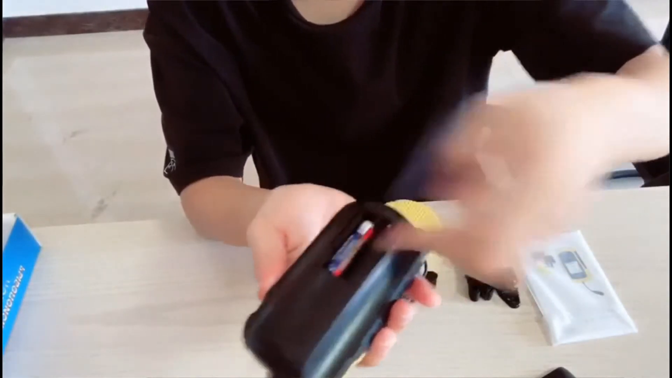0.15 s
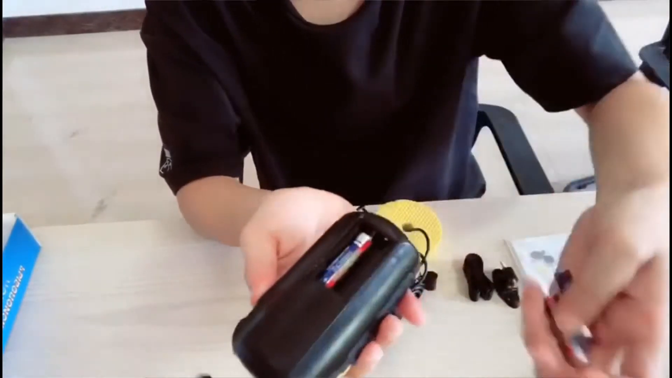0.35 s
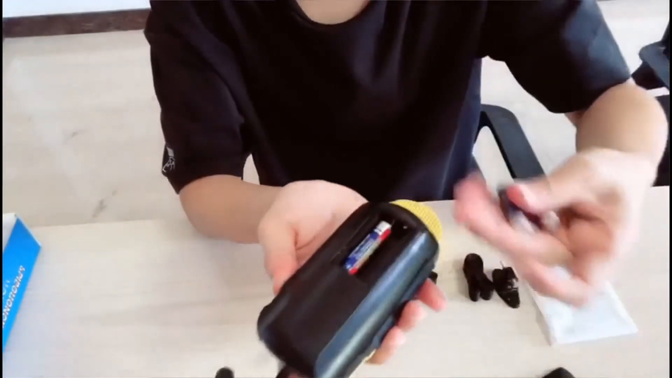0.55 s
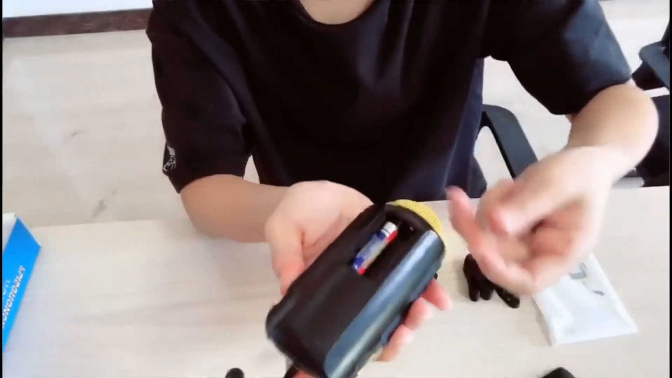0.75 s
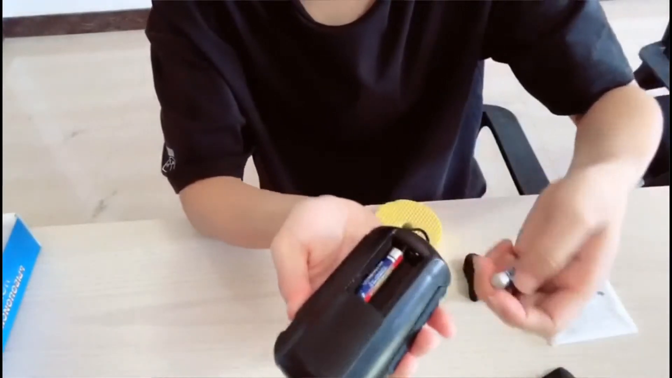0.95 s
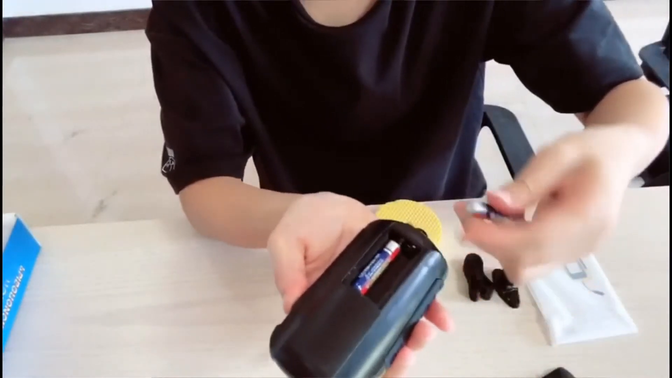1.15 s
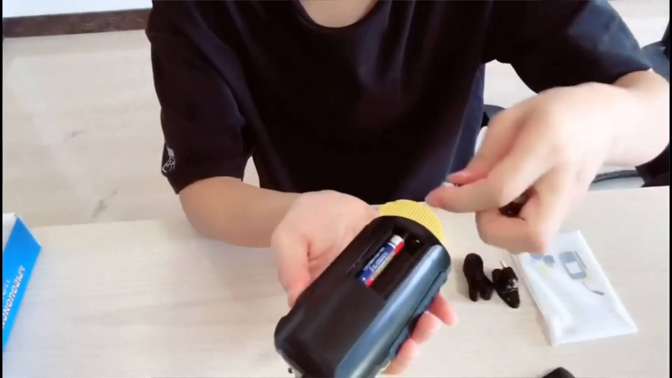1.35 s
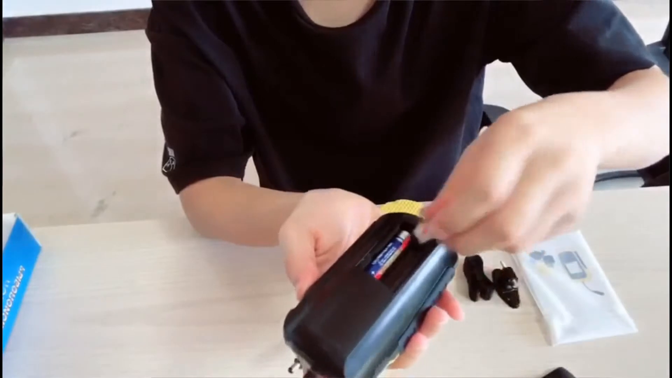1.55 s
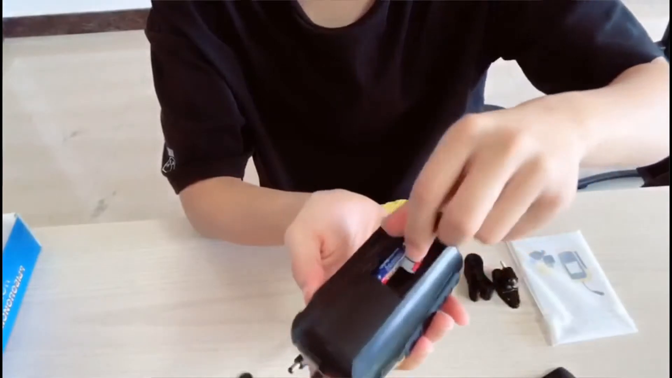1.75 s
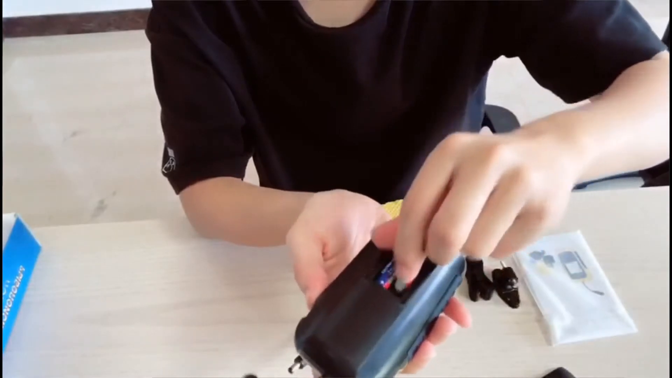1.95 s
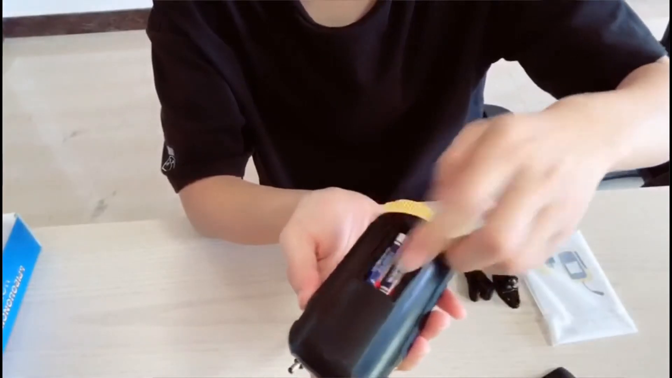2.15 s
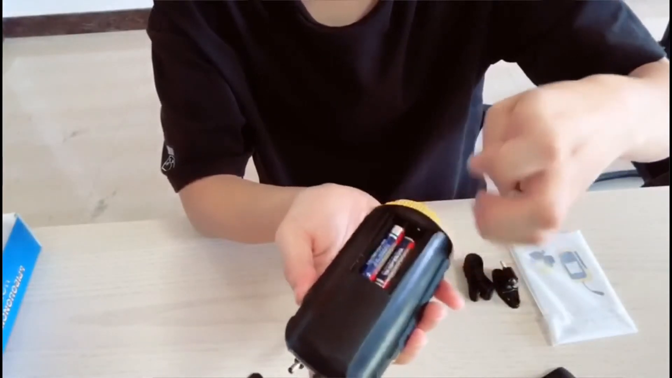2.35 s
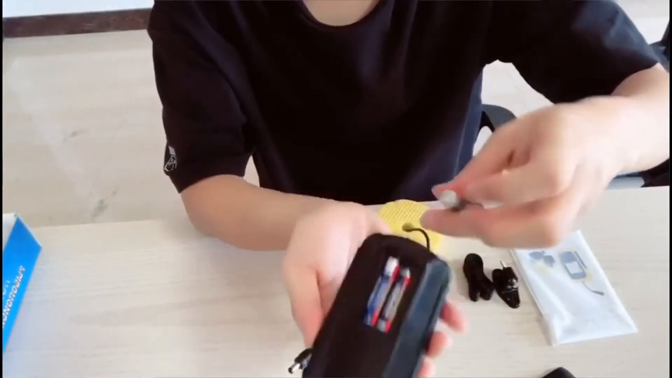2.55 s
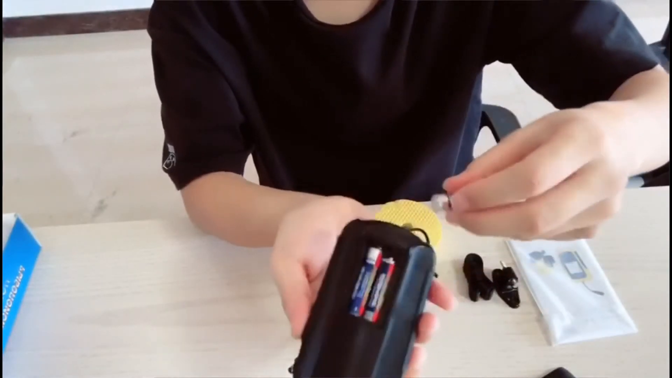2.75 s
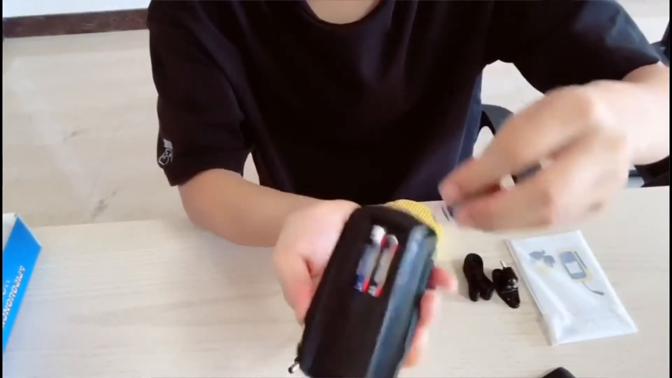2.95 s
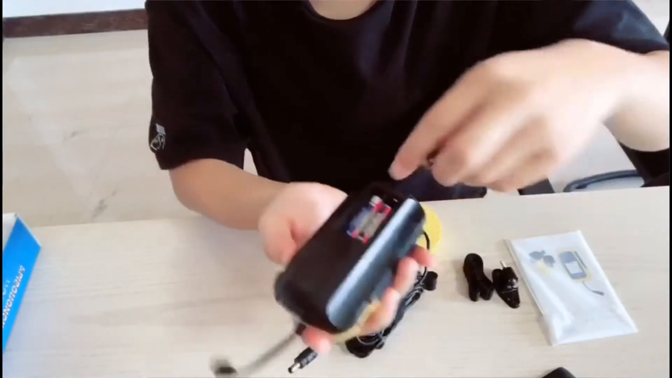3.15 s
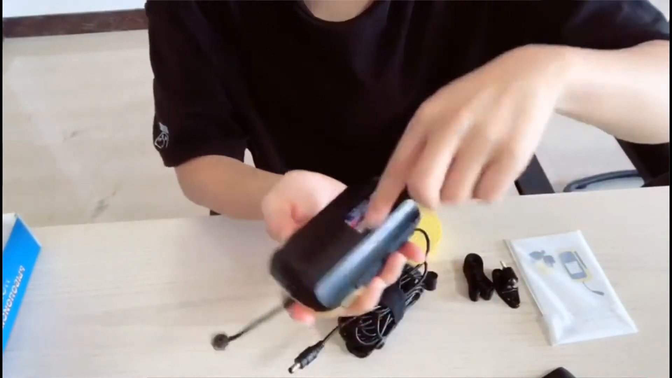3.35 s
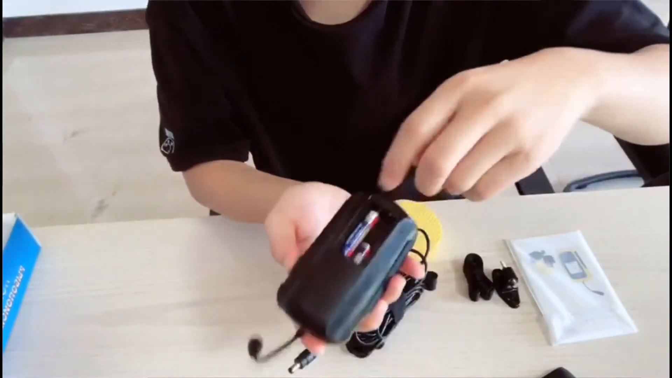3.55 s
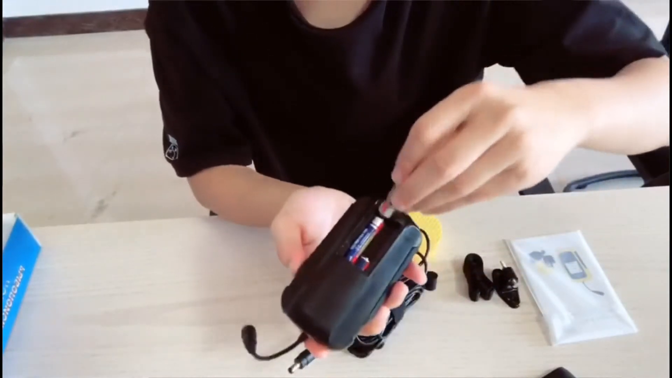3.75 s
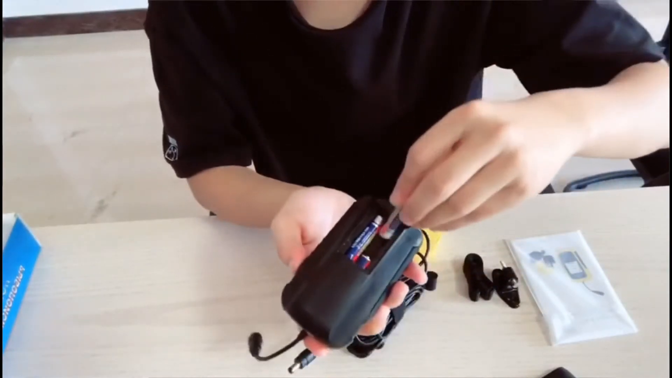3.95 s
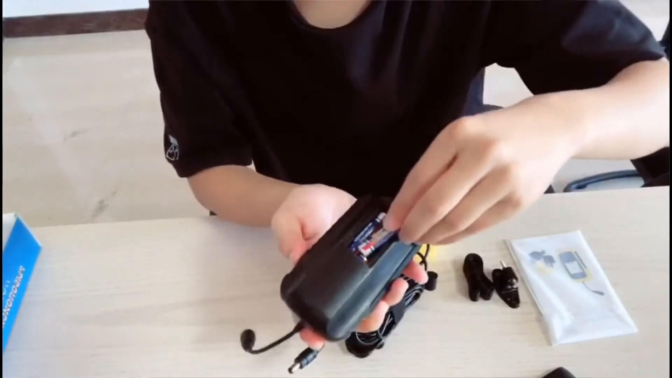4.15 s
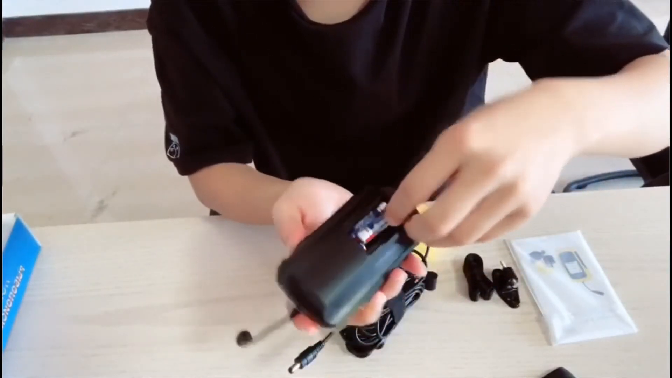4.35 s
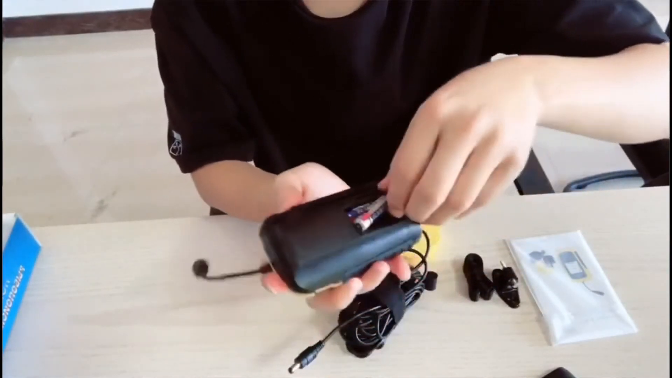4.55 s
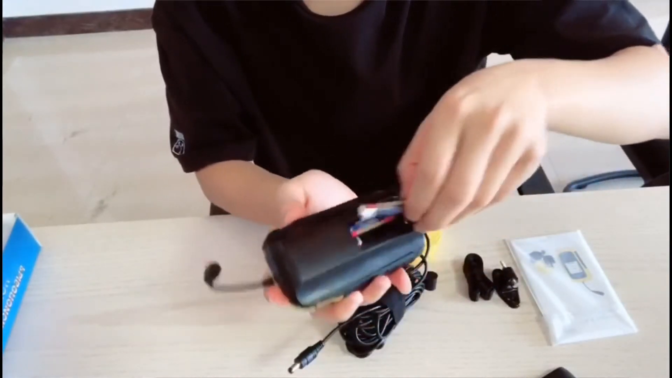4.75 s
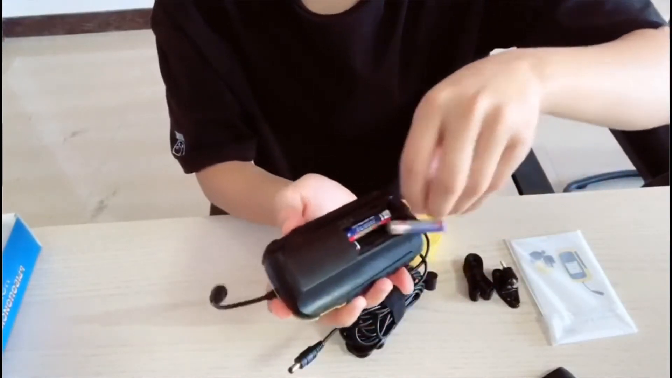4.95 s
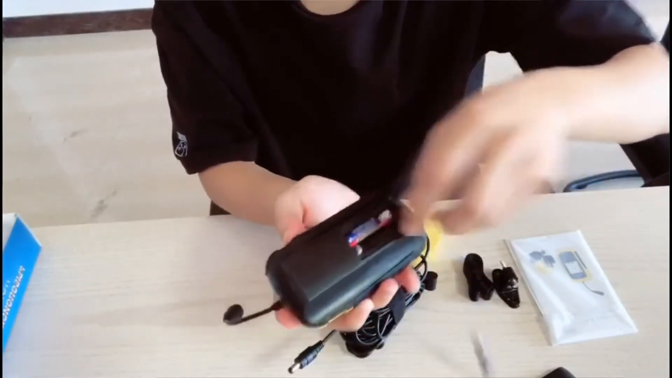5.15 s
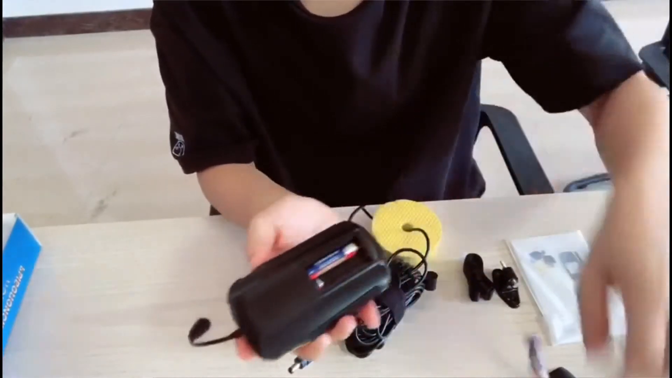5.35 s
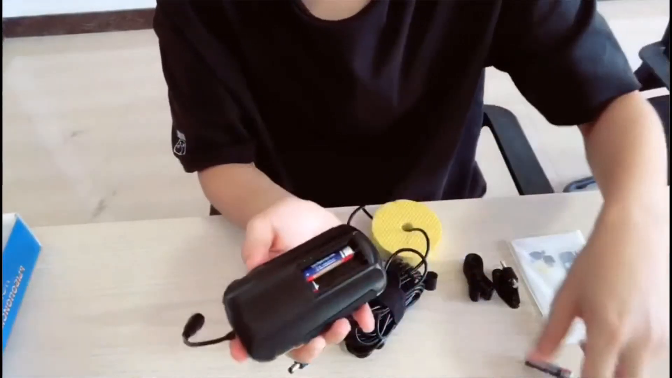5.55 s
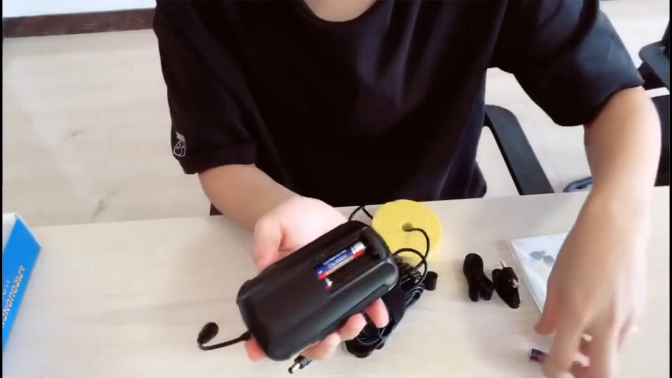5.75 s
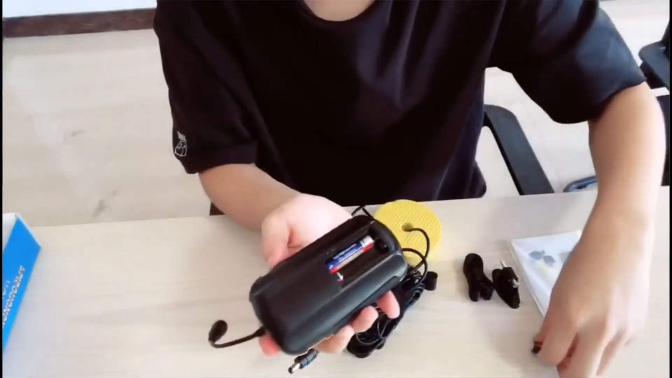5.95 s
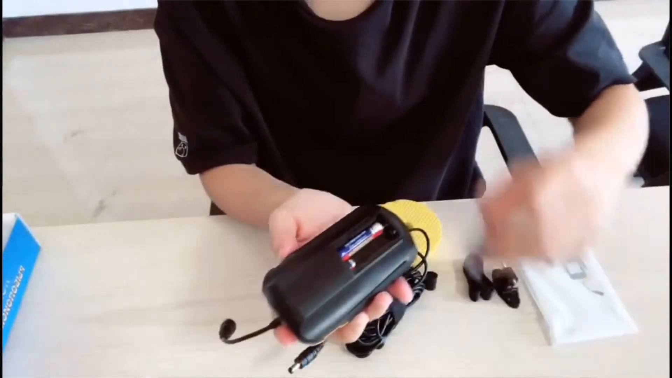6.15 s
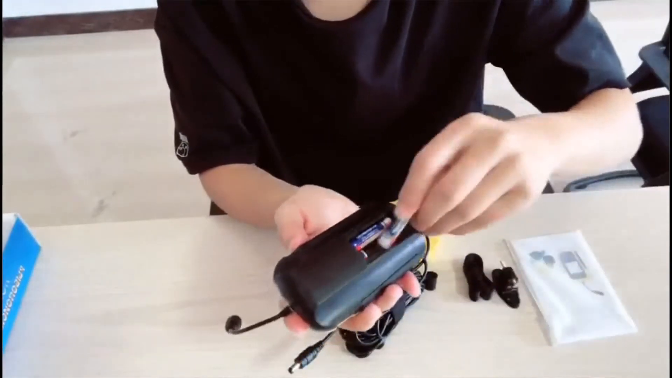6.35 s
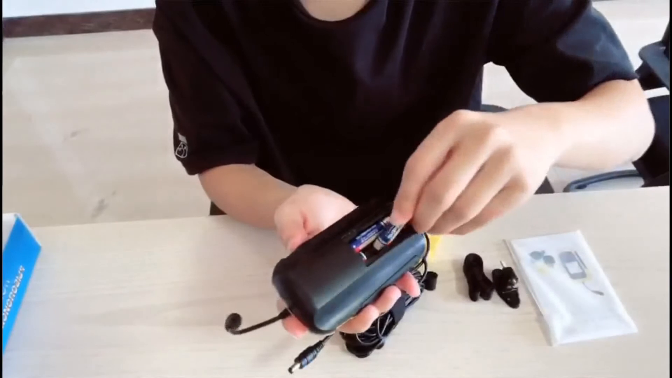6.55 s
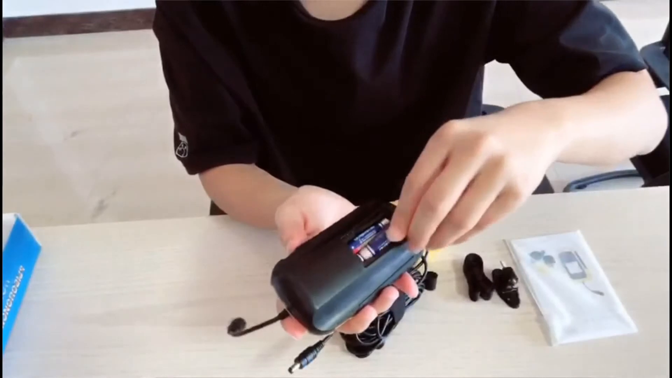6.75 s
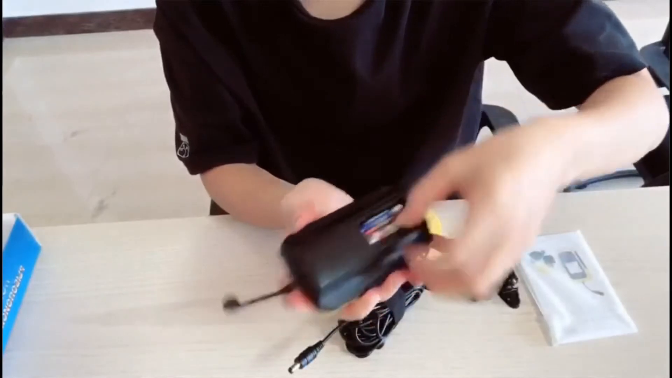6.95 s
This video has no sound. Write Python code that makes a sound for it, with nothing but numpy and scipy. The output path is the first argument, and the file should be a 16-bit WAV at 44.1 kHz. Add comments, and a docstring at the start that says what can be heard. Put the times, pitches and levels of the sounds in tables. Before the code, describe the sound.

Small batteries are pushed by hand into a hollow plastic compartment close to the microphone, with light clicks and brief scrapes. One catches on the spring and snaps home sharply. After more fiddling, another pops out with a loud click and a short spring buzz, thumps on the table and bounces with metallic ticks. More clicks follow. The large, bare room echoes slightly over a soft ventilation rumble.

```python
"""Small batteries click, chatter, slide and snap into a gadget's hollow plastic case, pushed by hand.
Each impact excites the damped normal modes of the body struck; a rough buzz follows two of them.
One cell slips out, thumps on the table and bounces on its steel can. Two clinks and soft bumps come
from further off. The large bare room reverberates for about a second over a soft ventilation rumble."""
import sys
import numpy as np
from scipy import signal
from scipy.fft import rfft, irfft
from scipy.io import wavfile
from scipy.ndimage import uniform_filter1d

SR = 44100
rng = np.random.default_rng(int(sys.argv[2]) if len(sys.argv) > 2 else 0)


def store_pcm(level_fs):
    """Save levels as 16-bit WAV."""
    pcm = np.round(np.clip(level_fs, -1, 1) * 32767).astype(np.int16)
    wavfile.write(sys.argv[1], SR, np.atleast_2d(pcm).T)


N = 312669

# Each row: start in seconds, level in dB, hollow ring and treble in dB relative to that level.
CASE_CLICKS = [(.2803, -38, -2, -14), (.8479, -51.5, -29.5, 0), (1.7663, -34.5, -3, -7.5),
               (1.7729, -36.5, -19.5, -25), (1.9108, -54, -8.5, -4.5), (1.9421, -38, -10.5, -8.5),
               (1.952, -40.5, -4.5, -10.5), (2.0084, -37.5, -8, -14.5), (2.146, -42, 8, -12),
               (2.1525, -44.5, 8, -11.5), (2.1595, -36, 2.5, -5.5), (2.3546, -37, -11, -14),
               (3.4673, -48, -12, 4), (3.4718, -40, -31, 1.5), (3.477, -41, -30, -4),
               (3.5124, -39.5, -6, -18), (3.5244, -39.5, -8, -12), (3.5324, -40, -4, -7.5),
               (3.5775, -42.5, 3, -7), (3.5882, -55, 10, -14), (4.041, -45.5, 3.5, 0.5),
               (4.0845, -43.5, 0.5, -3), (4.0925, -35, 6.5, 2.5), (4.1007, -40, 7, 0),
               (4.1222, -53, -11, -1), (4.1438, -52, -16, -2), (4.2045, -40, 1, -1), (4.2339, -50, 4, -6),
               (4.2395, -52, 7, -8), (4.3169, -28, -5.5, -2.5), (4.5555, -50.5, 3, -6),
               (4.6238, -53, 10, -6), (4.6311, -45.5, -10, -4), (4.6608, -46, 5, -14),
               (4.775, -44, 0.5, -5), (4.8235, -60.5, 10.5, -14.5), (5.031, -20, -10, -14.5),
               (5.0379, -17.5, -15, -6), (5.066, -32.5, -1.5, -12), (5.0804, -31, -8.5, -4),
               (5.1694, -40, 2, -18.5), (6.4559, -33, -1, -6.5), (6.4616, -37, -6, -13.5),
               (6.5645, -50, -7, -6), (6.6088, -44, -4, -18), (6.6285, -41, -19, -11),
               (6.6322, -46.5, -14, -3), (6.6943, -53, -22, -18), (6.7053, -43, -5.5, -18),
               (6.7625, -41.5, -13, -22), (6.7721, -53.5, 5.5, -12), (6.7899, -54, -13, -10),
               (6.8364, -32.5, -2.5, -27.5), (6.8625, -44, 12, -8), (6.8876, -42.5, 0, 0),
               (7.0459, -41, 2.5, -2)]
# Each row: frequency in Hz, level in dB, decay time T60 in seconds. All mode tables share this form.
CASE_MODES = [(413, 10, 0.013), (784, 15, 0.0089), (1366, -3.5, 0.035), (1550, 0, 0.011), (2165, -4, 0.011),
              (2715, 9.5, 0.0068), (3087, 3.5, 0.016), (3540, -3.5, 0.014), (3725, 2, 0.0041),
              (4530, 23.5, 0.0018), (5710, 0, 0.014), (6400, 4.5, 0.0098), (7430, -3.5, 0.019)]
def case_clicks():
    """Impacts excite the shell's modes; a looser grip damps its hollow mode less."""
    hits = click_bands(CASE_CLICKS + chatter())
    loose = (hits[:, 0] > 4.0) & (hits[:, 0] < 4.3)  # seconds in which the hand eases off
    loose_modes = list(CASE_MODES)
    hz, db, t60 = CASE_MODES[2]  # the hollow mode
    loose_modes[2] = (hz, db + 4, t60 * 1.5)
    return sum(strike(rows, modes, scatter_db=2.2, detune=.022, rise_s=.0001,
                      crack_s=.002, crack_db=(6, 4, 7, 4.1), smear=.8)
               for rows, modes in ((hits[~loose], CASE_MODES), (hits[loose], loose_modes)))


# Each row: start in seconds, number of catches, gap in seconds, peak level in dB,
# hollow ring and treble in dB relative to that level.
CHATTERS = [(3.4983, 3, 0.0039, -43, -8, -11), (6.842, 4, 0.0046, -21.5, -9.5, -17)]
def chatter():
    """Stick-slip motion over the spring gives nearly periodic click rows, weaker at either end."""
    rows = []
    for start, catches, gap_s, peak_db, hollow_db, treble_db in CHATTERS:
        jitter, scatter = rng.standard_normal((catches, 2)).T
        times = start + gap_s * (np.arange(catches) + .065 * jitter)
        levels = peak_db - 6 * np.linspace(-1, 1, catches) ** 2 + 3 * scatter
        rows += [(s, db, hollow_db, treble_db) for s, db in zip(times, levels)]
    return rows


# Snaps, with the columns of CASE_CLICKS, and the modes of the case with the cell held tight.
SEATING_SNAPS = [(2.2126, -23, -26, -1), (2.215, -12, -18, -7), (2.2725, -30, -15, 2),
                 (2.2739, -15.5, -21.5, -2), (2.3086, -25.5, -12.5, -10), (2.3356, -33, -10.5, -8)]
SEATED_MODES = [(414.4, -1, 0.02), (798, 4.5, .012), (1279, 0, 0.021), (1900, 0, .01), (2380, -11, 0.014),
                (2684, -3, .014), (3055, 1.5, 0.015), (3800, -4, 0.015), (4400, 3, 0.0068),
                (5840, -4.5, .01), (6715, 1, .009), (7720, -5, .008), (7840, -5, .008), (9260, -8, .008)]
def seating_snaps():
    """The spring's stored energy drives a cell home in a hard, bright impact."""
    return strike(click_bands(SEATING_SNAPS), SEATED_MODES, scatter_db=1.1, detune=.005, rise_s=.00012,
                  crack_s=.0012, crack_db=(-3.5, -2.5, 3.5, 8), smear=.34)


# Catches, with the columns of CASE_CLICKS, and the modes they excite.
SPRING_CATCHES = [(2.0314, -39, -7, -13.5), (2.0425, -43.5, -4.5, -19.5), (2.0495, -33.5, -10, -19),
                  (2.0639, -33, -4.5, -18.5), (2.0713, -28.5, -9, -17.5), (2.0765, -38, -6, -19),
                  (2.0818, -32, -10, -16.5), (2.0855, -33.5, -1, -19.5), (2.09, -34.5, -11, -14),
                  (2.0956, -34.5, -3, -16.5), (2.1042, -28, -12.5, -15.5), (2.1172, -33.5, -8.5, -28.5),
                  (2.1228, -29, -0.5, -8), (2.1335, -27, -4.5, -7.5), (2.138, -35.5, -3, -14.5),
                  (2.1415, -35, 2, -13.5), (2.1475, -49.5, 2, -12.5), (4.1661, -29.5, -15, -15),
                  (4.1714, -26.5, -10.5, -11), (4.1797, -23.5, -15, -10), (4.1833, -37, -6, -21),
                  (4.1878, -26, -8.5, -13), (4.1918, -34.5, -17, -11)]
SPRING_MODES = [(420, 0.5, 0.017), (1290, -5, 0.027), (1620, -3.5, 0.02), (2080, -9.5, 0.015),
                (3050, -5.5, 0.021), (3300, 2.5, 0.018), (3850, 0.5, .008), (6260, -2.5, .008),
                (6970, -7, 0.011), (7500, -12, .008)]
def spring_catches():
    """A cell catching on the contact spring's coils delivers a train of small impulses."""
    return strike(click_bands(SPRING_CATCHES, bass_db=-15), SPRING_MODES, scatter_db=2.5, detune=.012,
                  rise_s=.000076, crack_s=.0015, crack_db=(-2, 0, -5.5, -7.5))


# Each row: start in seconds, hold in seconds, level in dB, treble in dB relative to that level.
SLIDES = [(2.065, 0.099, -36, -6), (3.466, 0.03, -48.5, 5), (3.495, 0.024, -47.5, -4),
          (3.58, 0.017, -50.5, -22), (4.164, 0.03, -33.5, -5), (4.573, 0.028, -47, -0.5),
          (4.621, 0.038, -47.5, -7), (5.095, 0.22, -53, 6.5), (5.185, 0.02, -58.5, 14),
          (6.833, 0.02, -32, 2), (7.068, 0.027, -50.5, 4.5)]
def cell_slides(slips_per_s=9000, grit_db=1.5, attack_s=.013, fade_db_per_s=591):
    """Sliding friction: dense random slips ring the case's middle modes and hiss above them."""
    t, ring_t = np.arange(N) / SR, np.arange(SR // 10) / SR
    slips = (rng.random(N) < slips_per_s / SR) * rng.standard_normal(N)
    slips *= amp(grit_db * rng.standard_normal(N))
    ring = sum(amp(db) * decay(ring_t, t60) * np.sin(2 * np.pi * hz * ring_t)
               for hz, db, t60 in CASE_MODES if 900 < hz < 4200)
    rasp, hiss = convolve(slips, ring), band_pass(slips, 4400, 21000)
    out = np.zeros(N)
    for start, held_s, level_db, treble_db in SLIDES:
        rise = np.clip((t - start) / attack_s, 0, 1)
        level = rise * amp(level_db - fade_db_per_s * np.maximum(t - start - held_s, 0))
        out += level * (rasp / rasp.std() + amp(treble_db) * hiss / hiss.std())
    return out


# Each row: start in seconds, level in dB.
BUZZES = [(5.1, -38.5), (6.9, -61)]
# Each row: centre frequency in Hz, bandwidth in Hz, level in dB.
BUZZ_RESONANCES = [(2930, 58, -1.5), (3080, 53, 0.5)]
def buzz(swell_s=.021, t60=.7):
    """Narrow resonances driven by noise ring roughly, as of a freed spring buzzing on the shell."""
    ring = sum(amp(db) * band_pass(rng.standard_normal(N), hz - width / 2, hz + width / 2)
               for hz, width, db in BUZZ_RESONANCES)
    envelope = np.zeros(N)
    for start, db in BUZZES:
        age = np.maximum(np.arange(N) / SR - start, 0)
        envelope += amp(db) * decay(age, t60) * (1 - np.exp(-age / swell_s)) ** 2
    return envelope * ring / ring.std()


# Each row: start in seconds, then bass, low-mid, mid and treble levels in dB.
TABLE_THUMPS = [(5.3336, -20.5, -12.5, -14, -17), (5.3931, -28.5, -19, -23, -24),
                (5.7104, -39, -49, -27.5, -39), (5.7591, -40, -36.5, -27, -56)]
TABLE_MODES = [(95, -5, 0.097), (127, -3, 0.18), (240, 4.5, 0.074), (367, 18, 0.019), (545, 9.5, 0.079),
               (720, 16, 0.032), (970, 1, 0.0058), (1210, 7, 0.0097), (1470, 6.5, 0.0063), (2020, 9, 0.012),
               (2320, 7.5, 0.0084), (2900, 8, 0.012), (3480, -2, 0.008), (5300, 16, 0.0019),
               (6550, 20, 0.0026), (12400, 14.5, 0.0095), (12900, 19.5, 0.0045)]
def table_thumps():
    """The falling cell's impact sets the table vibrating; low modes ring longest."""
    return strike(TABLE_THUMPS, TABLE_MODES, scatter_db=1.7, detune=.017, rise_s=.000093,
                  crack_s=.0045, crack_db=(32, 23.7, 13.4, 5.1))


# Bounces, with the columns of TABLE_THUMPS, and the modes of the can.
CAN_BOUNCES = [(5.5543, -44, -34.5, -24.5, -16), (5.5578, -33, -42.5, -28.5, -8),
               (5.6615, -55.5, -44.5, -30.5, -15.5), (5.6635, -45.5, -33.5, -25, -8),
               (5.6655, -58.5, -53.5, -30.5, -13), (5.7705, -51, -32, -47, -18.5),
               (5.7722, -46, -30.5, -39, -19), (5.7745, -56, -45, -45, -18), (5.8094, -40, -61, -35, -31),
               (5.8311, -45, -33.5, -35, -29)]
CAN_MODES = [(505, -19.5, 0.096), (1320, -11.5, 0.012), (2760, -3, 0.017), (3370, -2.5, 0.017),
             (4197, 13.5, 0.0052), (4780, 5.5, 0.024), (5900, 3, 0.0055), (6900, -6.5, 0.004),
             (7920, 1.5, 0.01), (9700, -6, 0.008), (11100, -12.5, .012), (11800, -0.5, 0.014),
             (13800, 1.5, 0.012)]
def can_bounces():
    """Each rebound excites the high modes of the cell's stiff steel can."""
    return strike(CAN_BOUNCES, CAN_MODES, scatter_db=1.6, detune=.0032, rise_s=.00041,
                  crack_s=.0018, crack_db=(7.1, 14, 8.3, 13), smear=.6)


# Clinks, with the columns of TABLE_THUMPS, and their modes.
FAR_CLINKS = [(.4528, -65.5, -53, -31.5, -26), (2.947, -87.5, -56.5, -52.5, -47.5)]
CLINK_MODES = [(514, -3, 0.045), (1460, 1, 0.04), (2180, -0.5, 0.016), (2985, 4.5, 0.03), (3142, -3, 0.045),
               (3570, -6, 0.04), (5550, 2.5, 0.0068), (6300, -11, 0.02), (7150, -2, 0.03)]
def far_clinks():
    """A distant struck object vibrates freely in inharmonic modes."""
    return strike(FAR_CLINKS, CLINK_MODES, scatter_db=2.1, detune=.0057, rise_s=.00037,
                  crack_s=.015, crack_db=(2, 9, 1.5, .5))


# Bumps, with the columns of TABLE_THUMPS.
FAR_BUMPS = [(1.0, -46.5, -77.5, -77.5, -90), (0.53, -69, -85.5, -80, -100)]
def far_bumps():
    """Soft impacts put most of their energy into the bass."""
    return strike(FAR_BUMPS, TABLE_MODES, scatter_db=3.5, detune=.031, rise_s=.0006,
                  crack_s=.0051, crack_db=(21.48, 21.8, 22, 22))


# A snap, with the columns of TABLE_THUMPS, and its modes.
OPENING_SNAP = [(0.00053, -63, -35, -30.5, -32)]
OPENING_MODES = [(500, 2, .02), (1370, -5, 0.017), (1890, 6, .014), (2325, -3.5, .015), (3040, -1, .015),
                 (3496, 6, .017), (4150, -4, .012), (4990, -2, .012)]
def opening_snap():
    """An impulsive source whose reverberation opens the scene."""
    return strike(OPENING_SNAP, OPENING_MODES, scatter_db=1.2, detune=.0058, rise_s=.0001,
                  crack_s=.0055, crack_db=(3, 3, 3, 8.6))


def click_bands(rows, bass_db=-14):
    """A click's spectrum in four bands: the bass follows the low-mid hollow ring, with scatter."""
    start, level, hollow, treble = np.transpose(rows)
    bass = level + hollow + bass_db + 3.5 * rng.standard_normal(len(rows))
    return np.transpose([start, bass, level + hollow, level, level + treble])


# Bass, low-mid, mid and treble. Each row: lower and upper band edge in Hz.
BANDS_HZ = [(100, 900), (900, 2000), (2000, 4200), (4200, 15500)]
def strike(hits, modes, scatter_db, detune, rise_s, crack_s, crack_db, smear=1.5):
    """Modal superposition plus a crack of noise; each blow lands elsewhere and weights the modes anew."""
    out, t = np.zeros(N + SR), np.arange(SR // 6) / SR
    hz, db, t60 = np.transpose(modes)[:, :, None]
    mode_band = np.searchsorted([hi for lo, hi in BANDS_HZ], hz[:, 0])
    contact = (1 - np.exp(-t / rise_s)) ** 2  # the force builds up over the contact time
    for start, *levels_db in hits:
        weight, tune, phase = rng.standard_normal((3, len(modes), 1))
        noise = rng.standard_normal(len(t))
        angle = 2 * np.pi * hz * (1 + detune * tune) * t + smear * phase
        ring = amp(db + scatter_db * weight) * decay(t, t60) * np.sin(angle)
        i = int(start * SR)
        for k, level_db in enumerate(levels_db):
            grit = np.roll(noise, k * SR // 50)  # unrelated noise for each band
            crack = amp(crack_db[k]) * grit * np.exp(-t / crack_s)
            part = band_pass(contact * (ring[mode_band == k].sum(axis=0) + crack), *BANDS_HZ[k], order=3)
            out[i:i + len(t)] += amp(level_db) * part / rms(part[:SR // 200])  # level of the first 5 ms
    return out[:N]


# Each row: frequency in Hz, reverberation time T60 in seconds.
ROOM_T60 = [(200, 1.5), (1400, 1.745), (3700, 0.91), (9700, 0.65), (13300, 0.31), (16000, 0.16)]
def room(gap_s, rise_s):
    """Diffuse-field impulse response of unit energy: reflections swell, then decay band by band."""
    t = np.arange(2 * SR) / SR
    tail = sum(band * decay(t, on_log_hz(hz, ROOM_T60)) for hz, band in noise_bands(len(t)))
    tail *= 1 - np.exp(-np.maximum(t - gap_s, 0) / rise_s)
    return tail / np.sqrt(np.sum(tail ** 2))


# Each row: frequency in Hz, relative spectral density in dB.
VENT_SPECTRUM = [(15, -46), (25, -15.5), (53, -6), (122, -0.5), (193, 3), (267, -6), (289, -19),
                 (331, -3.5), (410, -4), (1200, -10), (2630, -21.5), (12800, -37), (15500, -52)]
def ventilation(level_db=-56.5, waver_db=1.5):
    """Broadband noise: a steady rumble and hiss whose bands waver independently."""
    step, out = SR // 4, 0
    for hz, band in noise_bands(N):
        waver = uniform_filter1d(np.repeat(rng.standard_normal(N // step + 1), step), step)[:N]
        out += amp(on_log_hz(hz, VENT_SPECTRUM) + waver_db * waver) * band
    return amp(level_db) * out / rms(out)


def noise_bands(length):
    """White noise split into half-octave bands, as (centre in Hz, signal) pairs."""
    hz = np.maximum(np.arange(length // 2 + 1) * SR / length, 1)
    white = rfft(rng.standard_normal(length))
    for centre in 30 * 2 ** np.arange(0, 9.6, .5):
        triangle = np.clip(1 - np.abs(2 * np.log2(hz / centre)), 0, 1)
        yield centre, irfft(white * triangle, length)


def on_log_hz(hz, table):
    """Interpolation on a log-frequency axis."""
    freqs, values = np.transpose(table)
    return np.interp(np.log(hz), np.log(freqs), values)


def band_pass(x, lo_hz, hi_hz, order=2):
    """Butterworth band-pass."""
    return signal.sosfilt(signal.butter(order, [lo_hz, hi_hz], "band", fs=SR, output="sos"), x)


def amp(db):
    return 10 ** (np.asarray(db) / 20)


def decay(t, t60):
    return amp(-60 * t / t60)


def rms(x):
    return np.sqrt(np.mean(x ** 2))


def convolve(x, response, skip=0):
    return signal.fftconvolve(x, response)[skip:skip + N]


def scene():
    """Direct and reverberant fields add; distant sources are heard mostly through the room."""
    clicks, snaps = case_clicks(), seating_snaps()
    case = band_pass(clicks + snaps + spring_catches() + buzz() + cell_slides(), 300, 11000)
    table, can = table_thumps(), can_bounces()
    clinks, bumps, opening = far_clinks(), far_bumps(), opening_snap()
    # hands shade the case, so it feeds the room less than the bare table does
    case_echo = convolve(amp(-16.5) * (case - .4 * snaps), room(gap_s=.0036, rise_s=.0026))
    fall = amp(-7) * band_pass(table, 60, 8000, order=1) + amp(-10.5) * can
    fall_echo = convolve(fall, room(gap_s=.0042, rise_s=.0017))
    open_room = room(gap_s=0, rise_s=.00011)
    far_echo = convolve(amp(3.5) * clinks + amp(.5) * bumps, open_room)
    opening_echo = convolve(opening, open_room, skip=int(.03 * SR))  # already ringing at the start
    direct = case + table + can + clinks
    echoes = case_echo + fall_echo + far_echo + opening_echo
    mono = band_pass(direct + echoes, 60, 6900) + ventilation()
    return np.array([mono, mono])


def record(dry):
    """Band limiting and saturation: one microphone loses the top treble and rounds the loudest peaks."""
    heard = signal.sosfilt(signal.cheby1(6, 1, 13900, fs=SR, output="sos"), dry)
    soft = np.tanh(.7 * heard) / .7
    return signal.sosfilt(signal.ellip(10, .2, 70, 15600, fs=SR, output="sos"), soft)


dry = scene()
out = record(dry)
store_pcm(out)
```